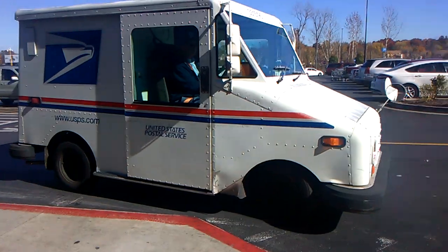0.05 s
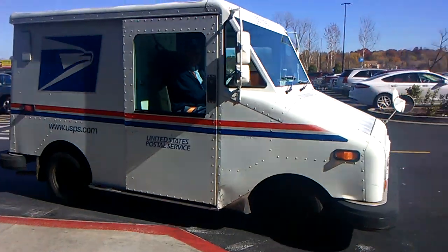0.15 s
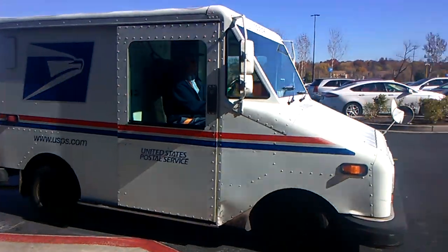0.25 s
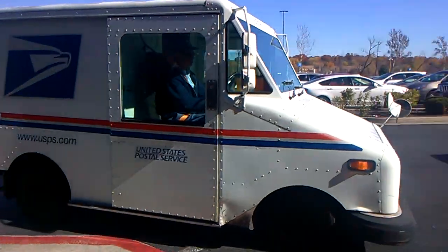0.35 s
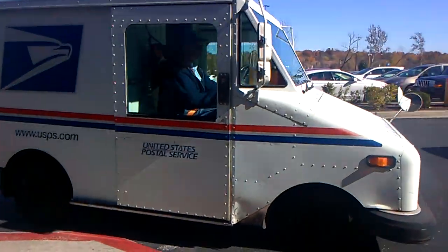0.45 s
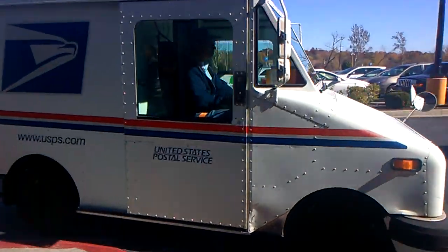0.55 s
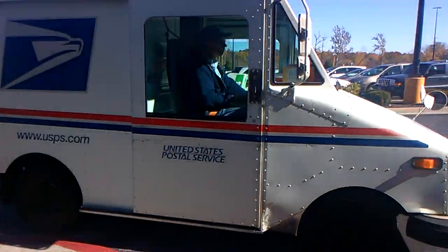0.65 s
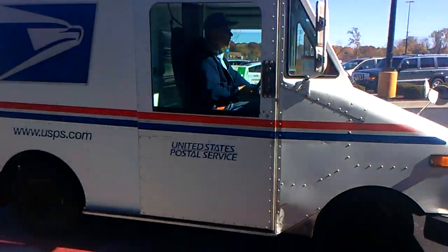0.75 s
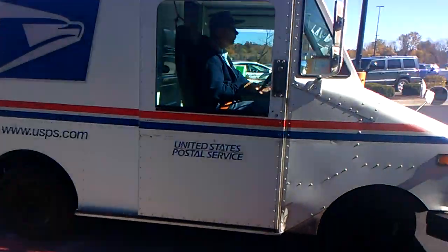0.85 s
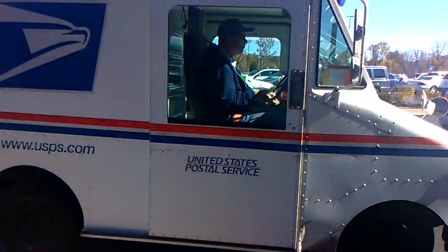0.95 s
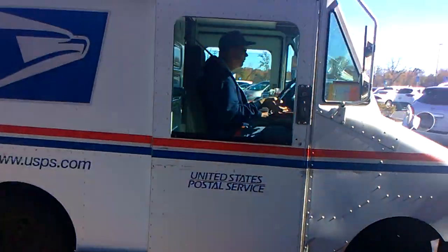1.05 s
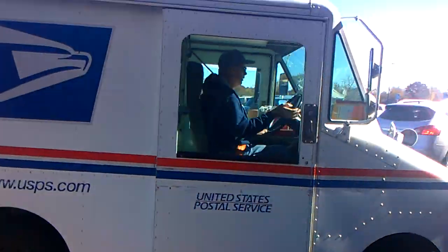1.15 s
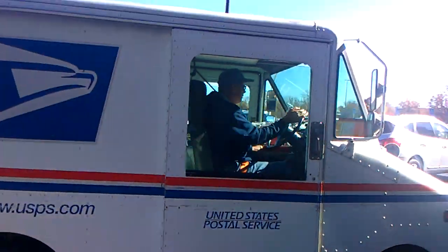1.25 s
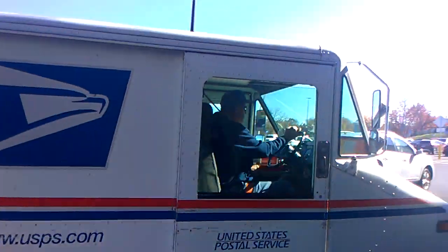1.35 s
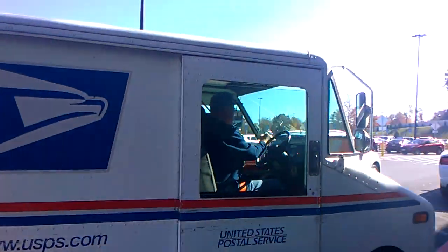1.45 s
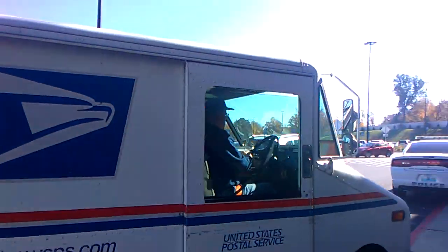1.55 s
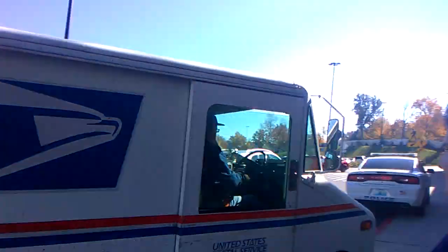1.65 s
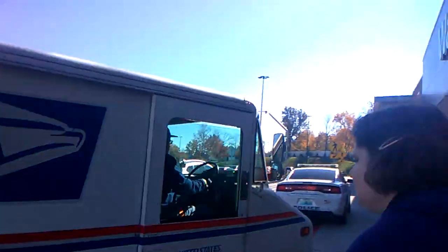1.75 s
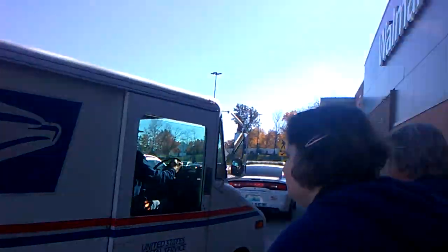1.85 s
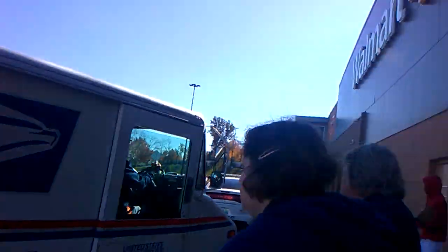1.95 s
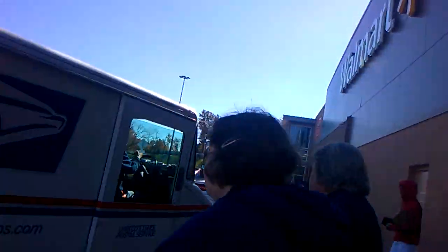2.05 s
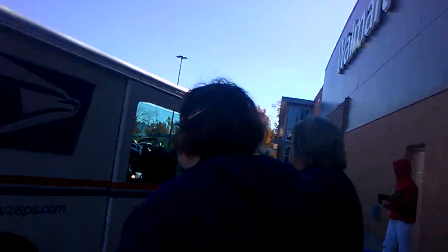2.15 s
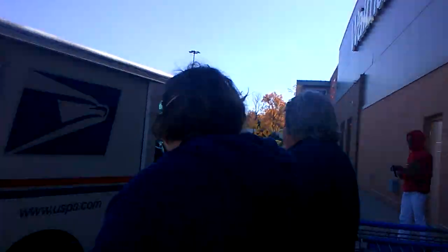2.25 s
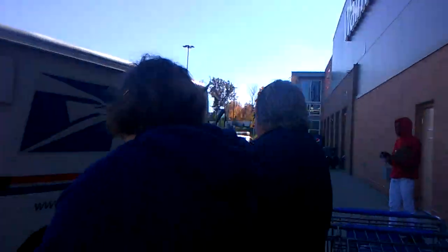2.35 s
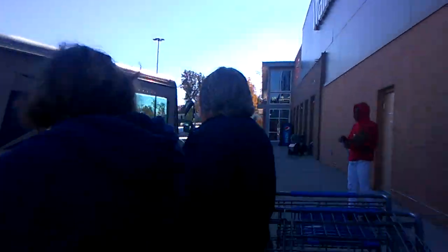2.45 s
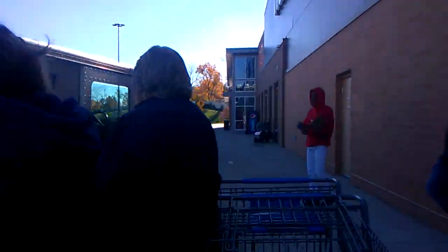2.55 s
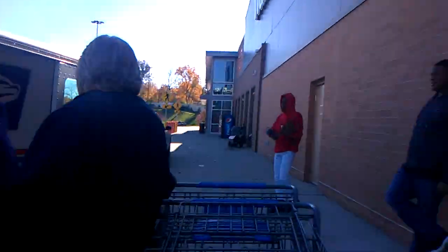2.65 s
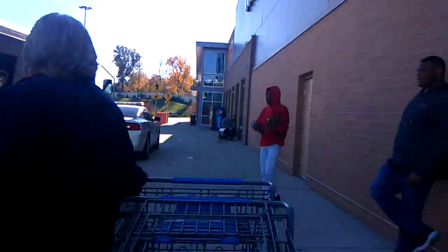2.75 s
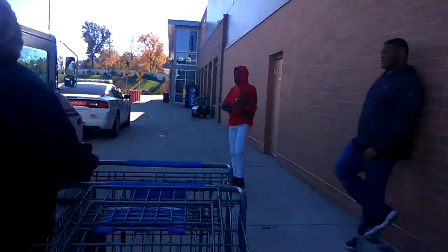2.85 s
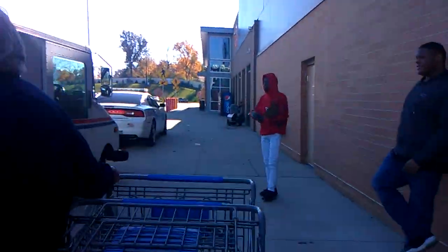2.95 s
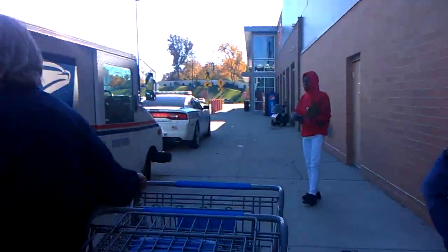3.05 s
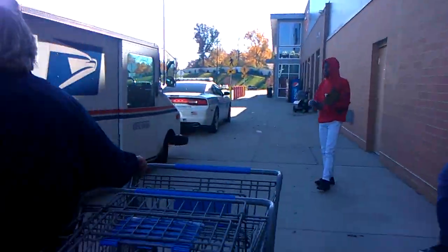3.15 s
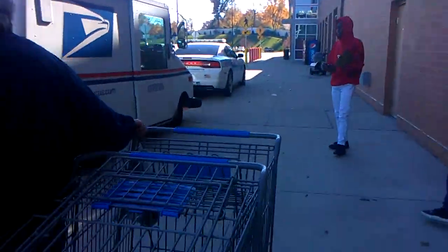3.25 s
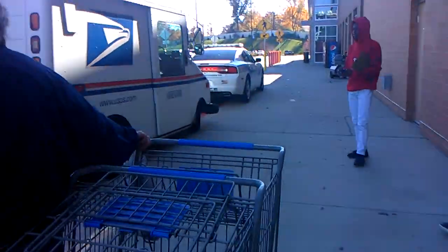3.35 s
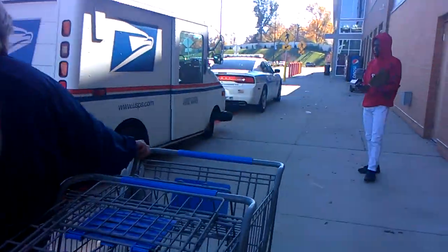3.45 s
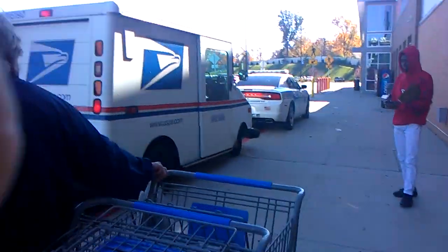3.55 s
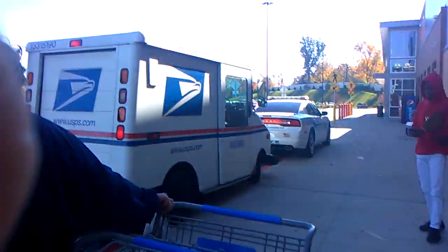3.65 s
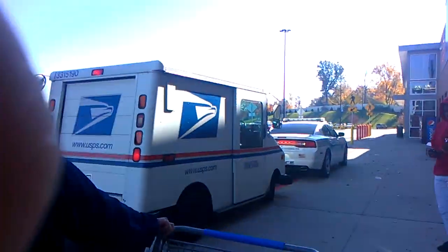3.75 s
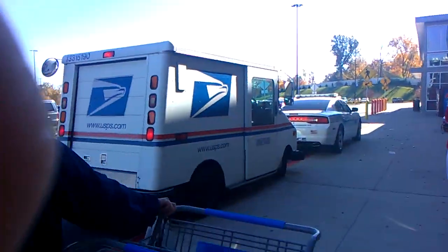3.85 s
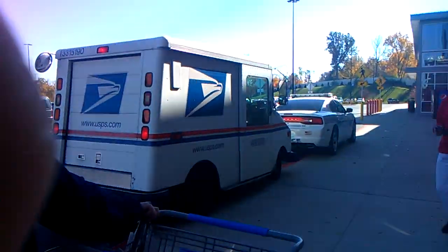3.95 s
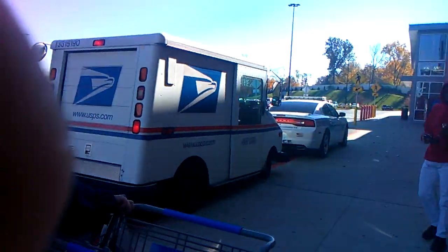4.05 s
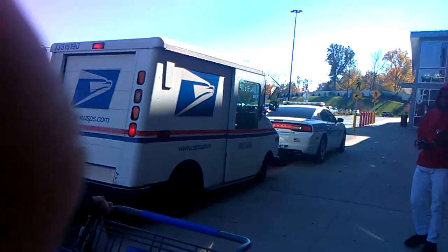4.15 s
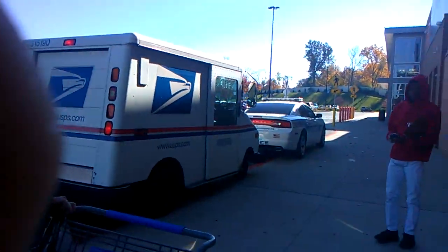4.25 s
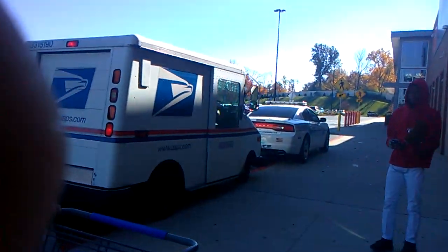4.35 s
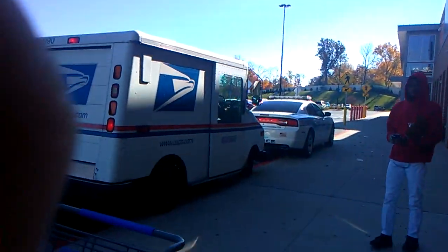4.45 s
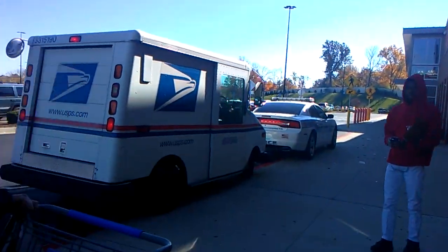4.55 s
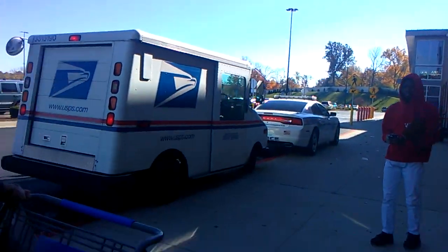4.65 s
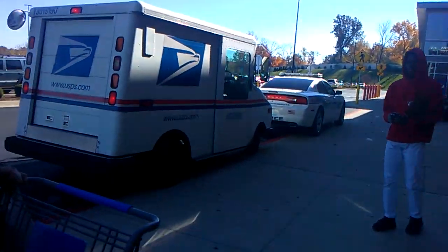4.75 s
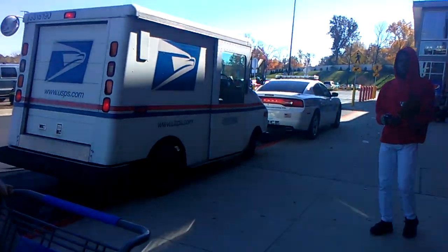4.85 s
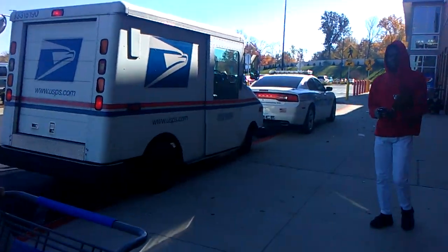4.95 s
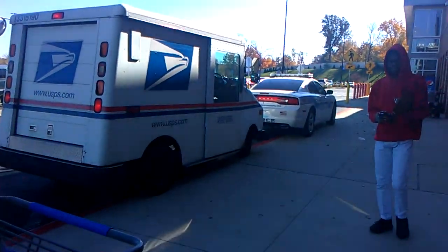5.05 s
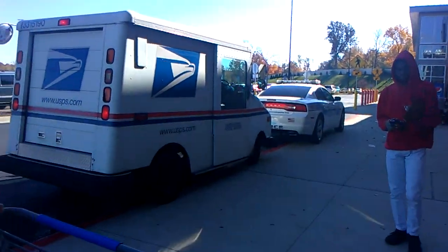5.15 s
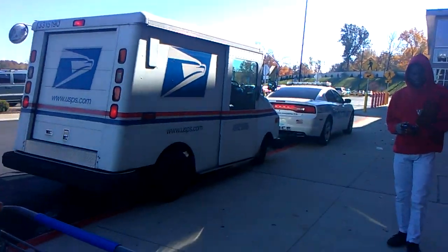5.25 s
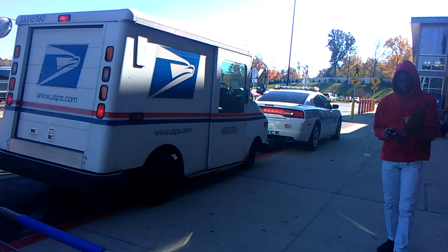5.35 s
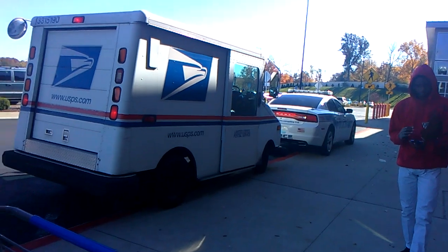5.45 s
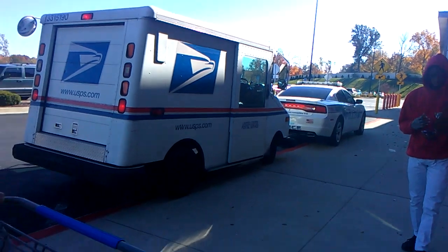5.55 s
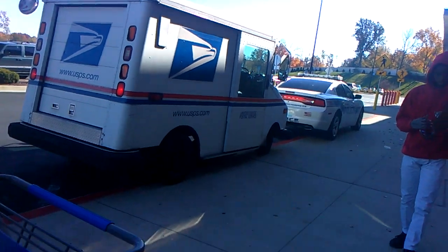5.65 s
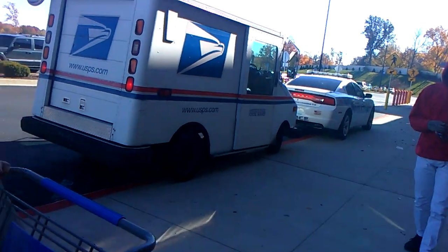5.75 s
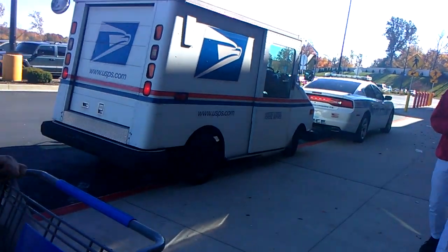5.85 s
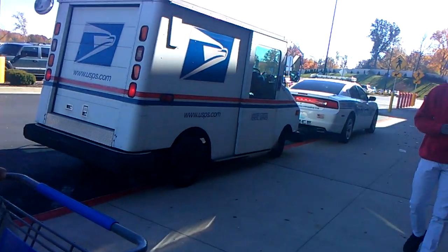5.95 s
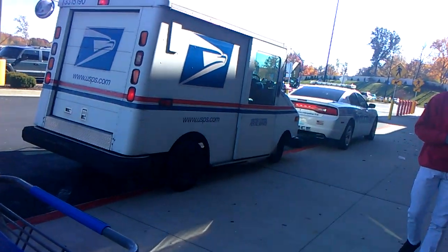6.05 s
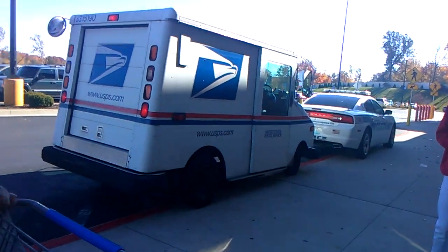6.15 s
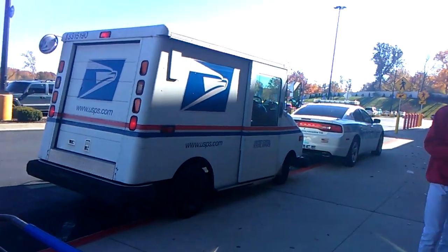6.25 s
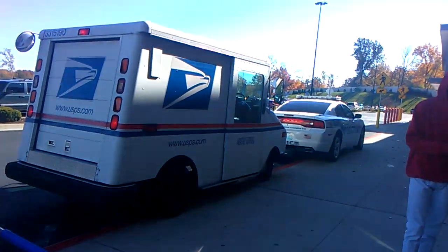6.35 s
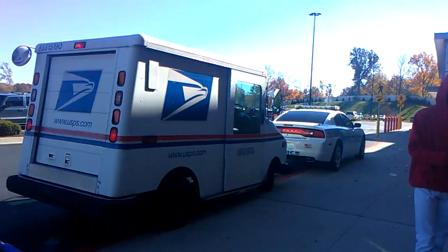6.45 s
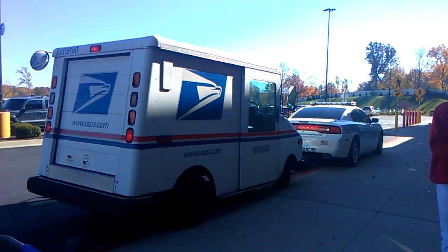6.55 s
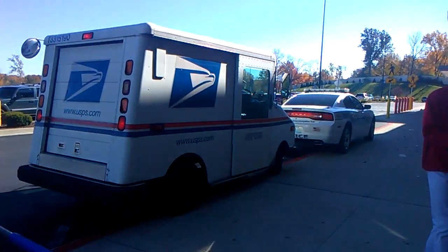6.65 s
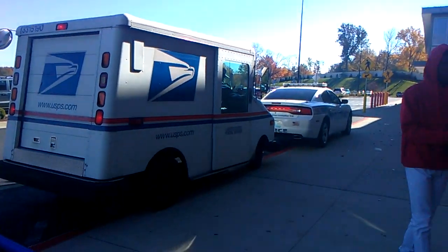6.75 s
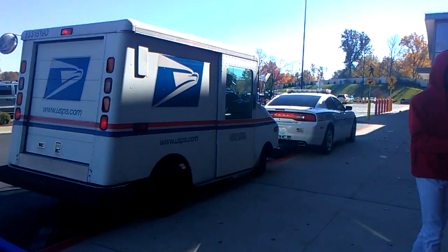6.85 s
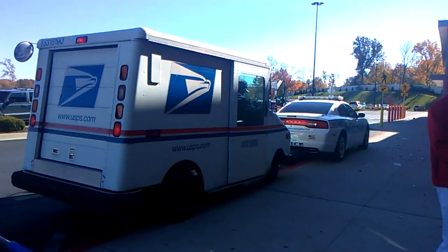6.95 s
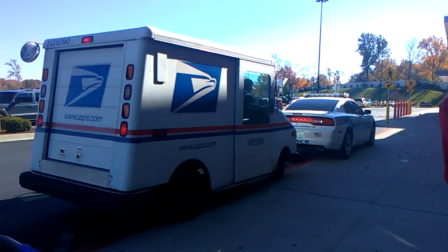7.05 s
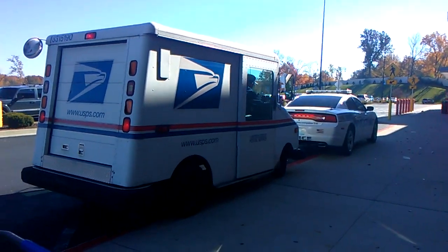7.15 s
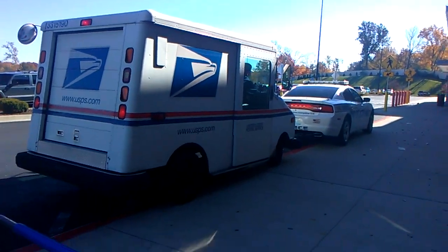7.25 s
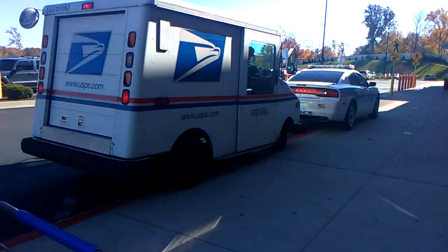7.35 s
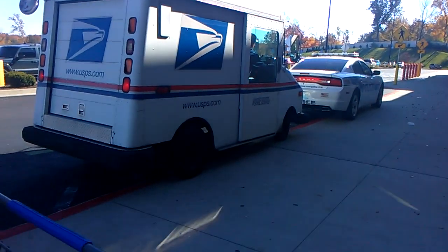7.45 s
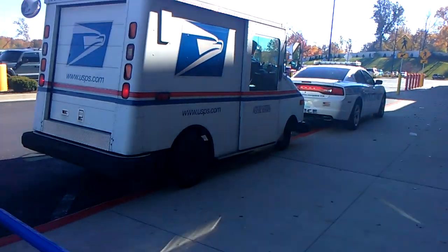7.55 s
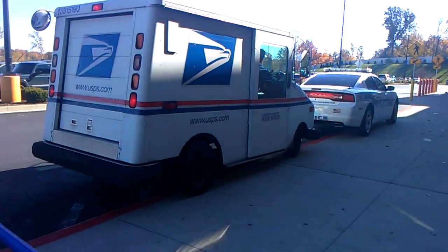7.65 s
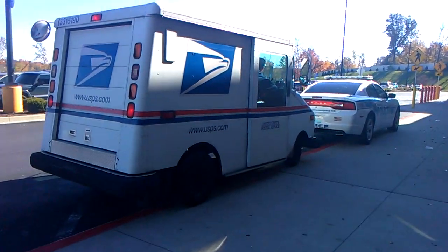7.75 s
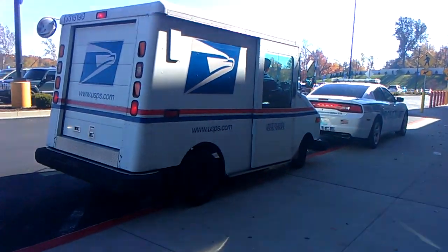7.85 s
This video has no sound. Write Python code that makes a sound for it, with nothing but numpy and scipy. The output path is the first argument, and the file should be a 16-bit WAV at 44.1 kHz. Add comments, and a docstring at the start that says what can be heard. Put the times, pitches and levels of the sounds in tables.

```python
"""A small delivery truck idles past close by, rolls ahead, revs once and falls quiet on a parking lot.
Its exhaust hums on multiples of the firing rate, a body panel drones, bay noise throbs and valves tick.
Clatter and hiss mix its engine and fan with a wire shopping cart, which rings, sings, scrapes and clanks
right beside the phone. Behind them lie a low rumble and a building's faint hum. The phone turns, its right
microphone hearing more treble; sound starts after half a second."""
import sys
import numpy as np
from scipy import signal
from scipy.fft import rfft, irfft, next_fast_len
from scipy.io import wavfile
from scipy.ndimage import uniform_filter1d, map_coordinates

SR = 44100
rng = np.random.default_rng(int(sys.argv[2]) if len(sys.argv) > 2 else 0)


def wav_out(sig):
    """Save sig, one row per channel (or a flat mono array), as 16-bit PCM at SR to the path in sys.argv[1]."""
    wavfile.write(sys.argv[1], SR, np.round(np.clip(np.atleast_2d(sig).T, -1, 1) * 32767).astype(np.int16))


N = 348213


def amp(db):
    """Decibels to an amplitude factor."""
    return 10 ** (np.asarray(db) / 20)


def pan(left_minus_right_db):
    """Gains of the left and right microphones, half the difference each way."""
    return amp(np.outer([.5, -.5], left_minus_right_db))


def unit(x):
    """Scales x to rms 1."""
    return x / np.sqrt(np.mean(x ** 2) + 1e-20)


def along(points, hz):
    """Reads (f/Hz, value) points on a log frequency axis."""
    f, v = np.transpose(points)
    return np.interp(np.log(hz + 1), np.log(f + 1), v)


def shaped(spectrum):
    """The gain against frequency of a table of f/Hz, level/dB."""
    return lambda hz: amp(along(spectrum, hz))


def curves(rows):
    """One value per sample for each column after t/s."""
    s, *cols = np.transpose(rows)
    return [np.interp(np.arange(N) / SR, s, c) for c in cols]


def wobble(rate):
    """A smooth random curve with rate knots a second."""
    coarse = np.arange(0, N + 64, 64)
    knots = rng.standard_normal(int(N * rate / SR) + 4)
    return np.interp(np.arange(N), coarse, map_coordinates(knots, [coarse * rate / SR]))


def filtered(x, response):
    """Applies a complex response of frequency to x."""
    m = next_fast_len(N + SR // 2)
    return irfft(rfft(x, m) * response(np.fft.rfftfreq(m, 1 / SR)), m)[..., :N]


def modes(table):
    """The summed response of resonances, alternating in sign."""
    def response(f):
        return sum((-1) ** k * amp(db) * 1j * f * width / (hz * hz - f * f + 1j * f * width)
                   for k, (hz, width, db) in enumerate(table))
    return response


# how alike the two microphones hear diffuse noise: f/Hz, likeness (0 to 1)
MIC_LIKENESS = [(60, 0.91), (180, 1), (530, 0.72), (1590, 0.22), (3000, 0.028), (4750, 0.016),
                (14200, 0.014)]


def rush(response, patchy_db):
    """Stereo noise of rms 1 with patches of random gain; bass alike at both microphones."""
    z = signal.stft(rng.standard_normal((2, N)), nperseg=512)[2]
    field = rng.standard_normal(z.shape[1:])
    field = uniform_filter1d(uniform_filter1d(field, 6, 0), 8, 1)
    pair = signal.istft(z * amp(patchy_db * unit(field)), nperseg=512)[1][:, :N]

    def mid_side(hz):
        turn = np.arccos(np.clip(along(MIC_LIKENESS, hz), -1, 1)) / 2
        return response(hz) * np.array([np.cos(turn), np.sin(turn)])

    mid, side = filtered(pair, mid_side)
    return unit(np.array([mid + side, mid - side]))


def burst(hz, width, size, order=2):
    """Stereo noise of rms 1 in a band around hz, reaching a factor 1 + width either way."""
    edges = np.clip([hz / (1 + width), hz * (1 + width)], 50, 16000)
    band = signal.butter(order, edges, "band", fs=SR)
    alike = np.clip(along(MIC_LIKENESS, hz), 0, 1)
    left, other = rng.standard_normal((2, size))
    return unit(signal.lfilter(*band, [left, alike * left + np.sqrt(1 - alike ** 2) * other]))


def add(track, s, sound):
    """Mixes a short sound in at s seconds."""
    part = track[:, round(s * SR):][:, :sound.shape[-1]]
    part += sound[..., :part.shape[1]]


def building_hum():
    """The building's faint steady hum is a narrow noise band, alike at both microphones."""
    return amp(-55) * burst(117.6, 0.029, size=N)[0]


# low rumble of traffic and rolling wheels: f/Hz, relative level/dB
RUMBLE_SPECTRUM = [(12, -50), (20, -16), (48, 6.5), (140, -2.5), (250, -5), (300, -8), (390, -72),
                   (660, -120)]


def ground_rumble(bay_db):
    """Low noise of traffic and rolling wheels follows part of the engine bay's swings."""
    # -46 dB whenever the bay setting stands at -53.5 dB
    level_db = -46 + 0.6 * (bay_db + 53.5)
    return amp(level_db) * rush(shaped(RUMBLE_SPECTRUM), patchy_db=1.2)


# mid-band clatter, engine and fan as the truck passes, the cart later: f/Hz, relative level/dB
CLATTER_SPECTRUM = [(410, -62), (700, -11.5), (825, -10.5), (1990, -13), (3700, -12), (4280, -17.5),
                    (5500, -21.5), (7150, -29), (12100, -120)]
# treble hiss and jingle, engine fan and cart together: f/Hz, relative level/dB
HISS_SPECTRUM = [(2650, -9), (4500, -19), (6260, 8), (7860, 7.5), (8630, 11), (9380, 8.5), (10800, 4.5),
                 (12900, 0.5), (14600, -9.5)]
# loose wires: f/Hz, bandwidth/Hz, relative level/dB
CHIME_MODES, CHIME_DB = [(6880, 190, 1), (8850, 41, -3.8)], -11.5  # CHIME_DB is relative to the hiss


def clatter_and_hiss(clatter_db, hiss_db):
    """Two noise bands of engine, fan and cart, roughened by random small shocks that chime loose wires."""
    # the cart's shocks are faint at first and stand out from 2.3 s on
    shock_share = np.interp(np.arange(N) / SR, [1.9, 2.3], [.04, .26])
    shocks = (rng.random(N) < 60 / SR) * amp(9.9 * rng.random(N))  # about 60 a second
    decay_s = 0.026
    decaying = signal.lfilter([1], [1, -np.exp(-1 / (decay_s * SR))], shocks)
    shake = unit(1 + shock_share * decaying)
    clatter = amp(clatter_db) * shake * rush(shaped(CLATTER_SPECTRUM), patchy_db=2.1)
    hiss = amp(hiss_db) * shake * rush(shaped(HISS_SPECTRUM), patchy_db=2.0)
    chimes = unit(filtered(shocks * rng.standard_normal(N), modes(CHIME_MODES)))
    return clatter + hiss + amp(hiss_db + CHIME_DB) * chimes * shock_share / shock_share.max()


# basket resonances: f/Hz, bandwidth/Hz, level/dB before the tilt
BASKET_WIRES = [(486.3, 38, -3.5), (789.5, 45, -3.5), (1003, 28, -8.5), (1800, 45.1, -17.5),
                (2040, 42, -11.5), (2570, 350, -8)]
# ringing of the basket: t/s, level/dB, tilt/dB per octave around 800 Hz
BASKET_RINGING = [(2, -56.5, -10.5), (2.65, -64, -26.5), (3.2, -52.5, 0), (3.85, -50, 5), (4.5, -48.5, 1),
                  (5.1, -50.5, 3.5), (5.8, -42.5, 0), (6.4, -55.5, -4), (7, -62, -1.5), (7.9, -72, 0)]


def ringing_basket():
    """Narrow noise bands at the basket's resonances swell, flutter and turn grainy."""
    level_db, tilt_db = curves(BASKET_RINGING)
    wires = 0
    for hz, width_hz, db in BASKET_WIRES:
        unsteady_db = 1.2 * wobble(1.63) + 2.2 * wobble(7) + 3 * wobble(35)
        wire_db = db + tilt_db * np.log2(hz / 800) + unsteady_db
        wires = wires + amp(wire_db) * burst(hz, width_hz / hz / 2, size=N, order=1)
    return amp(level_db) * wires


# one wire sings for a while: t/s, length/s, f/Hz, level/dB before the arch
SINGING_WIRES = [(3.23, 0.14, 808, -49), (3.642, .2, 1865, -46.5), (3.783, 0.19, 2075, -42.5),
                 (4.532, 0.18, 1614, -48.5), (5.28, 0.33, 1740, -44), (5.48, 1.15, 1006, -51.5),
                 (6.179, 0.14, 568, -50.5), (6.49, 0.097, 514, -51.5), (6.693, 0.055, 524, -44),
                 (7.147, 0.52, 728, -65.5)]


def singing_wires(broken_db):
    """A single wire sings as a narrow noise band under an arch, its level unsteady."""
    out = np.zeros((2, N))
    bandwidth = 0.045  # share of the pitch
    for s, length_s, hz, db in SINGING_WIRES:
        size = round(length_s * SR)
        arch = np.sqrt(np.sin(np.pi * np.sqrt(np.arange(size) / (length_s * SR))))
        level = amp(db + broken_db[round(s * SR):][:size])
        add(out, s, level * arch * burst(hz, bandwidth / 2, size=size, order=1)[0])
    return out


# a wheel drags over rough paving: t/s, level/dB before the envelope, f/Hz,
# band reach/share of f, left minus right/dB
WHEEL_SCRAPES = [(4.9, -26, 3502, 1.77, 1), (5.058, -36, 7030, 0.63, 19), (6.19, -45, 2790, 0.089, 2),
                 (6.379, -42.5, 2870, 0.19, 1), (6.55, -46.5, 2750, 0.12, 2)]


def wheel_scrapes(broken_db):
    """A dragging wheel gives a band of noise with a soft rise, a decay and an unsteady level."""
    out, t = np.zeros((2, N)), np.arange(SR // 2) / SR
    rise_s, t60_s = 0.048, 0.54
    for s, db, hz, width, pan_db in WHEEL_SCRAPES:
        level_db = db - 60 * t / t60_s + broken_db[round(s * SR):][:len(t)]
        envelope = amp(level_db) * (1 - np.exp(-t / rise_s))
        add(out, s, pan(pan_db) * envelope * burst(hz, width, size=len(t), order=3))
    return out


def cart():
    """The basket rings, single wires sing and wheels scrape."""
    broken_db = 3 * wobble(14)
    return ringing_basket() + singing_wires(broken_db) + wheel_scrapes(broken_db)


# wheels hit joints in the paving: t/s, drive level/dB, low ring f/Hz,
# treble level/dB re drive, t60/s of ring and treble, rattle level/dB re drive
CLANK_HITS = [(2.283, -31.5, 789, -28, 0.039, -14), (3.773, -31.5, 758, -28, 0.3, 4),
              (4.886, -37.5, 720, -20, 0.7, 1), (7.348, -41, 1010, -8.5, 0.22, -2),
              (7.618, -44.5, 800, -18, 0.075, -14), (7.775, -37, 1430, -12, 0.17, 2.5)]
# the cart frame rings along with every clank: f/Hz, level/dB re drive
FRAME_RINGS = [(410, 1.5), (2100, -5.5), (3800, -12.5)]


def clanks():
    """A wheel hitting a joint gives a noisy low ring, frame rings, a bright edge and a sharp crack."""
    out, t = np.zeros((2, N)), np.arange(SR // 2) / SR
    ragged_db = 3 * wobble(90)
    crack_hz, crack_db, crack_t60_s = 1700, -1, 0.067  # crack_db is relative to the rattle
    for s, db, hz, treble_db, t60_s, rattle_db in CLANK_HITS:
        body = 2.1 * burst(hz, 0.051, size=len(t), order=1)
        body += amp(rattle_db) * burst(1030, 1.5, size=len(t), order=3)
        for ring_hz, ring_db in FRAME_RINGS:
            ring = burst(ring_hz, 0.014, size=len(t), order=1)
            body += amp(ring_db + rng.normal(0, 1)) * ring
        # the raggedness grows in after the hit
        body *= amp(np.resize(ragged_db[round(s * SR):], len(t)) * np.tanh(t / 0.017))
        crack = amp(rattle_db + crack_db - 60 * t / crack_t60_s) * burst(crack_hz, 1.0, size=len(t))
        edge = amp(treble_db) * burst(8600, 0.28, size=len(t))
        clank = amp(-60 * t / t60_s) * (body + edge) + crack
        add(out, s, amp(db - 7.0) * clank * (1 - np.exp(-t / 0.0011)))
    return out


# loose wires clash: t/s, drive level/dB, ring f/Hz, t60/s, left minus right/dB
WIRE_CLASHES = [(4.29, -20, 7140, 0.054, 0), (4.405, -23, 13540, .02, 15), (4.954, -14.5, 8030, 0.074, -6),
                (5.079, -19, 8060, 0.069, -8), (5.243, -20, 3860, 0.045, 18),
                (5.7774, -23, 6775, 0.084, -9), (5.858, -18, 6600, 0.087, -11),
                (6.212, -24.5, 6930, 0.13, -11), (6.4276, -22.5, 7400, 0.3, 1),
                (6.665, -24.5, 8150, 0.15, -7.5), (6.928, -34.5, 6600, 0.065, -7),
                (6.9885, -36, 5400, .02, 1), (7.007, -36, 8170, 0.086, -7), (7.12, -42.5, 10100, 0.13, -9),
                (7.296, -34, 7350, 0.059, -8), (7.716, -33, 3870, 0.021, -25.5)]


def wire_clashes():
    """Clashing wires splash briefly: a ringing noise band plus a wider band at 8 kHz."""
    out, t = np.zeros((2, N)), np.arange(SR // 2) / SR
    for s, db, hz, t60_s, pan_db in WIRE_CLASHES:
        splash = 0.77 * burst(hz, 0.084, size=len(t)) + 0.48 * burst(8000, 0.34, size=len(t))
        rise = 1 - np.exp(-t / (0.02 * t60_s))
        add(out, s, pan(pan_db) * amp(db - 14.5 - 60 * t / t60_s) * splash * rise)
    return out


# dull bumps: t/s, drive level/dB, f/Hz, t60/s
DULL_BUMPS = [(2.734, -29, 204.2, 0.031), (6.331, -47.5, 47.3, 0.85), (6.681, -50, 54.2, 0.51),
              (7.54, -58, 245, 0.15)]


def thumps():
    """A dull bump is one low decaying sine, alike at both microphones."""
    out, t = np.zeros((2, N)), np.arange(SR // 2) / SR
    for s, db, hz, t60_s in DULL_BUMPS:
        envelope = amp(db + 17.5 - 60 * t / t60_s) * (1 - np.exp(-t * hz * 3))
        add(out, s, envelope * np.sin(2 * np.pi * hz * t))
    return out


# drone of the body panel: t/s, level/dB
PANEL_DRONE = [(.55, -54.5), (.74, -38), (1.7, -37), (2.26, -42), (2.4, -55), (2.55, -39), (2.85, -53),
               (3.05, -42.5), (3.5, -52.5), (4.1, -39), (4.5, -39.5), (4.9, -52.5), (5.33, -35),
               (5.85, -38.5), (6.05, -62.5), (7, -66)]


def panel_drone():
    """The body panel drones as noise through one sharp resonance, applied twice."""
    resonance = modes([(332, 22, 0)])
    return amp(curves(PANEL_DRONE)[0]) * rush(lambda hz: resonance(hz) ** 2, patchy_db=0.5)


# engine bay noise: f/Hz, relative level/dB
BAY_SPECTRUM = [(210, 5), (423, 7.5), (572, 5), (672, -3.5), (1070, -22), (2500, -38), (3250, -45),
                (5500, -120)]


def bay_noise(bay_db, firings, running):
    """Noise of the engine bay throbs with each firing while the engine runs."""
    throb = amp(2.0 * np.cos(2 * np.pi * firings) * running)
    return amp(bay_db) * throb * rush(shaped(BAY_SPECTRUM), patchy_db=0.5)


def valve_ticks(tick_db, firings):
    """About one tick a firing, jittered in time and uneven in strength, rings in narrow bands."""
    lead, jitter = 0.35, 0.064  # shares of the firing cycle
    valves = firings + lead + jitter * wobble(30)
    phase = valves % 1
    strength = amp(4.5 * np.tanh(rng.standard_normal(400)))[valves.astype(int)]
    pulse = unit(strength * phase ** 2 * np.exp(-phase / 0.09))
    ring = np.sin(2 * np.pi * np.cumsum(3680 + 230 * wobble(30)) / SR)
    ring = ring + burst(3700, 0.035, size=N)
    lower = .5 * burst(1960, .06, size=N) + .6 * burst(2600, .08, size=N)
    return amp(tick_db) * pulse * (ring + amp(5 * wobble(25)) * lower)


# engine block: f/Hz, level/dB re the block column
BLOCK_SPECTRUM = [(33, -44), (65, 1.5), (98, -14), (130, -4.5), (163, -11.5), (195, -15), (228, -6),
                  (280, -44)]
# tailpipe: f/Hz, level/dB re the tailpipe column
TAILPIPE_SPECTRUM = [(31, -14), (41, -10), (61, -50), (95, -17), (120, 1.5), (150, -27), (160, -11),
                     (184, 2), (197, -13.5), (216, -7), (240, -23), (330, -19.5), (400, -18)]
# which side the exhaust stands on: t/s, left minus right/dB
EXHAUST_SIDE = [(1.9, 3.5), (2.4, 6.5), (2.75, 6), (3.3, 2), (4, 3.5)]


def exhaust_hum(firing_hz, firings, block_db, muffler_db, tail_db):
    """Ten multiples of the firing rate, weighted by block, muffler can and tailpipe."""
    muffler_hz, muffler_width_hz = 96.7, 14.9
    hum = 0
    for k in range(10):
        hz = (k + 1) * firing_hz
        size = amp(block_db + along(BLOCK_SPECTRUM, hz)) + amp(tail_db + along(TAILPIPE_SPECTRUM, hz))
        size += amp(muffler_db) * np.exp(-.5 * ((hz - muffler_hz) / muffler_width_hz) ** 2)
        # uneven combustion shakes size and timing of each multiple, but they keep step
        uneven = amp(1.3 * wobble(16) + .7 * wobble(3))
        phase = 2 * np.pi * (k + 1) * firings + 0.4 * wobble(9) + .15 * k * k
        hum = hum + np.sqrt(2) * size * uneven * np.sin(phase)
    return hum * pan(curves(EXHAUST_SIDE)[0])


# the nose passes, the tail turns this way, one rev: t/s, firing f/Hz,
# engine block, muffler boom, tailpipe (each level/dB before its spectrum)
ENGINE_PASS = [(0.56, 35.1, -47.5, -45, -77.5), (0.68, 33.18, -38.5, -28.5, -60),
               (0.8, 33.02, -31, -25, -73), (1.13, 32.34, -32.5, -22.5, -72), (1.4, 33.51, -32, -17.5, -72),
               (1.88, 31.83, -35, -22.5, -72), (2.07, 31.08, -41, -49, -51), (2.4, 32.42, -38.5, -63, -70),
               (2.6, 32.14, -43, -37.5, -73), (2.8, 31.83, -66, -33, -46.5),
               (3.29, 32.14, -53, -35.5, -44.5), (3.62, 31.7, -90, -42.5, -47),
               (3.9, 30.35, -48, -46.5, -41.5), (4.6, 31.05, -44, -64, -44), (5.1, 30.56, -56, -60, -40.5),
               (5.2, 32.2, -43.5, -44.5, -49), (5.44, 37.47, -59, -33.5, -32),
               (5.65, 39.8, -41, -46, -29.5), (5.86, 39.68, -57, -64.5, -32),
               (5.96, 35.53, -38.5, -65, -44.5), (6.1, 32.18, -60, -77, -45), (6.3, 31.5, -60, -51, -52)]


def truck(bay_db, tick_db):
    """One count of firings drives hum, valve ticks and bay throb; the body panel drones along."""
    firing_hz, block_db, muffler_db, tail_db = curves(ENGINE_PASS)
    firings = np.cumsum(firing_hz) / SR + 0.2957
    running = np.interp(np.arange(N) / SR, [6.25, 6.4], [1, 0])  # engine falls quiet
    hum = exhaust_hum(firing_hz, firings, block_db, muffler_db, tail_db)
    engine = running * (hum + valve_ticks(tick_db, firings))
    return engine + panel_drone() + bay_noise(bay_db, firings, running)


# noise layers: t/s, engine bay level/dB, mid-band clatter level/dB, treble hiss and jingle level/dB,
# valve ticking level/dB (each before its unsteadiness or ring)
LAYER_LEVELS = [(.55, -64, -47.5, -51, -73), (.72, -39, -32.5, -39.5, -53), (1.65, -41, -32.5, -39.5, -49),
                (1.9, -43, -35.5, -42, -53), (2.1, -50.5, -50, -46, -63.5),
                (2.55, -52.5, -59.5, -54, -59.5), (2.76, -38.5, -53, -52, -77),
                (2.9, -49.5, -56.5, -50.5, -62.5), (3.6, -51, -57, -49, -66),
                (4.15, -47.5, -47.5, -50, -54.5), (4.5, -45.5, -47.5, -48, -49),
                (5.15, -44, -46.5, -47, -52.5), (5.35, -47, -41.5, -47.5, -49.5),
                (5.8, -44.5, -41, -42, -50.5), (6.05, -57.5, -53.5, -49, -103), (6.7, -61, -61, -56, -90),
                (7.2, -64, -69.5, -66, -92), (7.5, -60.5, -78.5, -70, -90), (7.9, -58, -65, -67, -88)]


def scene():
    """The parking lot, from the far rumble and hum to the cart at hand and the truck passing close by."""
    bay_db, clatter_db, hiss_db, tick_db = curves(LAYER_LEVELS)
    background = ground_rumble(bay_db) + building_hum()
    cart_sounds = cart() + clanks() + wire_clashes() + thumps()
    return background + clatter_and_hiss(clatter_db, hiss_db) + cart_sounds + truck(bay_db, tick_db)


# microphone difference at full turn: f/Hz, left minus right/dB
MIC_LEAN = [(60, -3), (130, -9), (290, -0.5), (620, 0.5), (1360, -7), (2970, -4.5), (6490, -6.5),
            (10000, -24), (14200, -16.5)]
# how far the phone points one microphone at the noise: t/s, share
PHONE_TURN = [(2.5, 0.76), (4, 0.63), (7.9, 0.18)]
# left microphone late as the phone turns: t/s, lag/ms
LEFT_LAG = [(.6, .25), (2, .25), (2.6, -.25), (3.8, -.25), (4.2, .2), (7.9, .2)]


def record(dry):
    """As the phone turns, treble and arrival time shift between its microphones; fade-in, then band limit."""
    start_s, fade_s, top_hz = .539, 0.0063, 14550
    turned = filtered(dry, lambda hz: pan(along(MIC_LEAN, hz)))
    share = np.clip(curves(PHONE_TURN)[0], 0, 1)
    heard = share * turned + (1 - share) * dry
    half_lag = curves(LEFT_LAG)[0] * SR / 2000  # ms to samples, half for each microphone
    ports = [map_coordinates(port, [np.arange(N) - side * half_lag])
             for port, side in zip(heard, (1, -1))]
    fade = np.clip((np.arange(N) / SR - start_s) / fade_s, 0, 1)
    return filtered(fade * ports, lambda hz: hz < top_hz)


dry = scene()
out = record(dry)
wav_out(out)
```